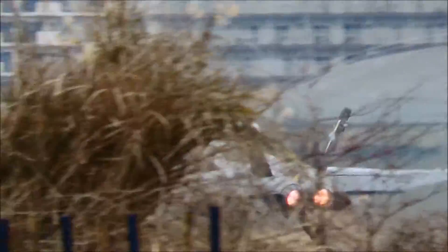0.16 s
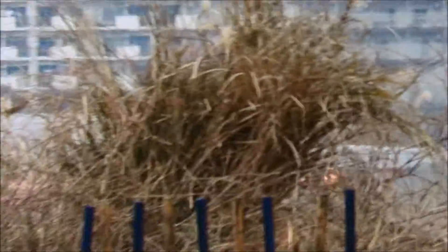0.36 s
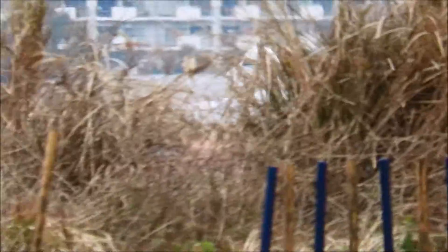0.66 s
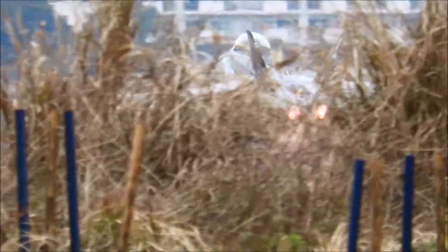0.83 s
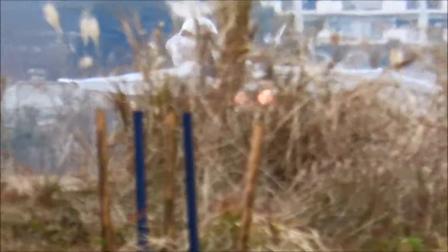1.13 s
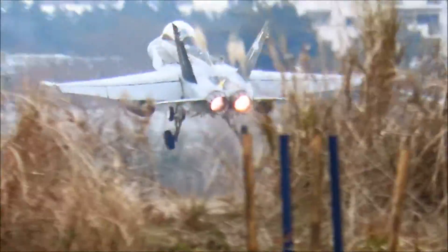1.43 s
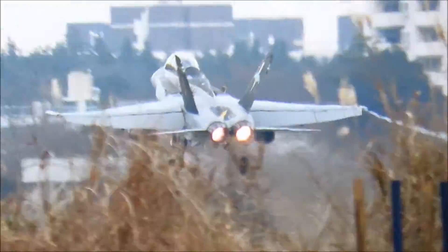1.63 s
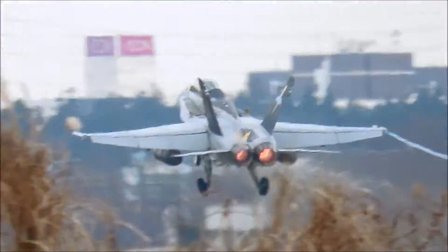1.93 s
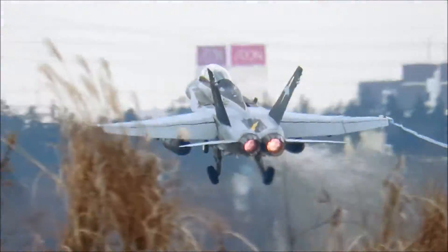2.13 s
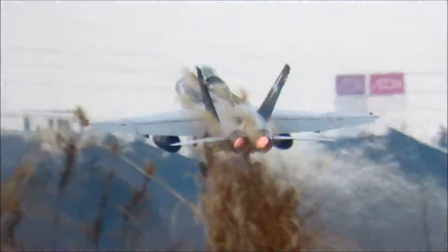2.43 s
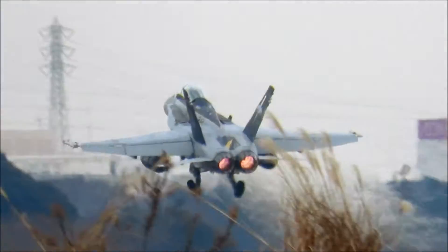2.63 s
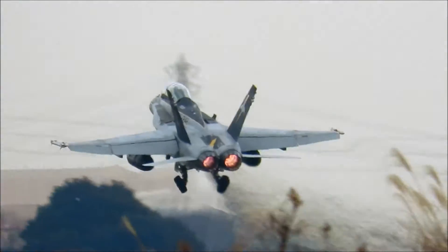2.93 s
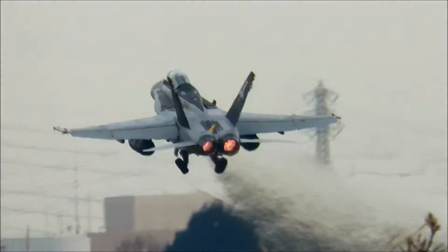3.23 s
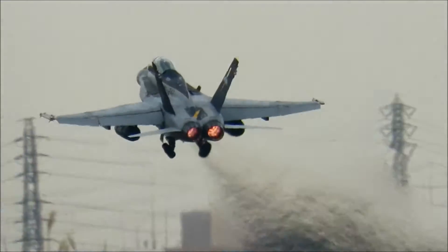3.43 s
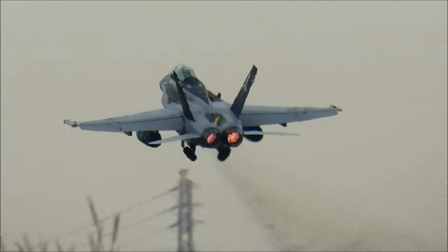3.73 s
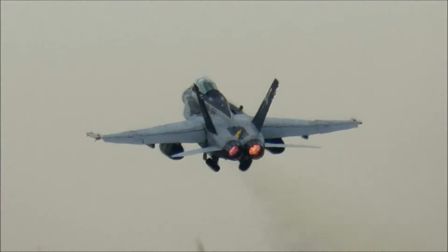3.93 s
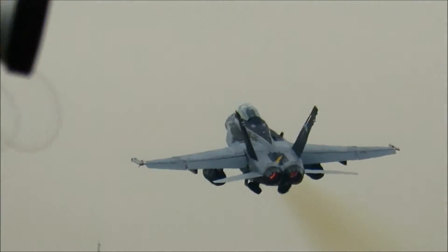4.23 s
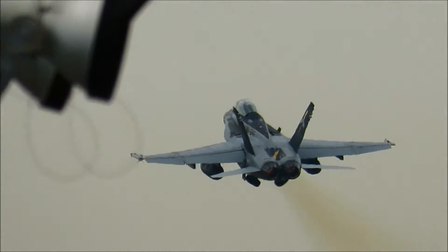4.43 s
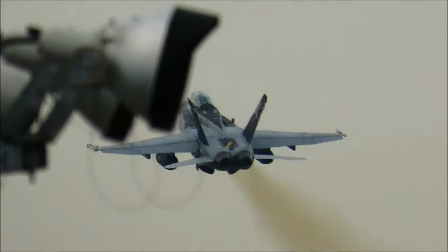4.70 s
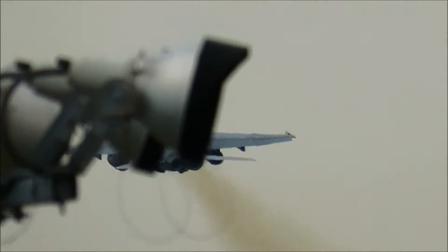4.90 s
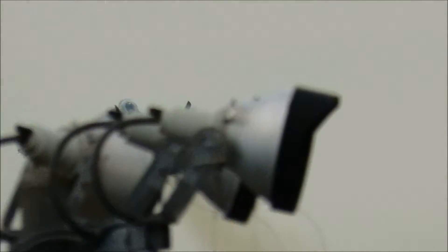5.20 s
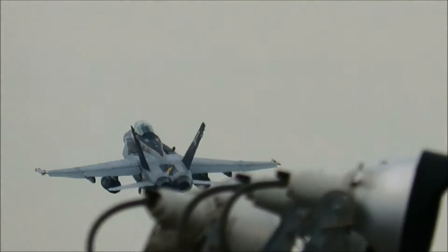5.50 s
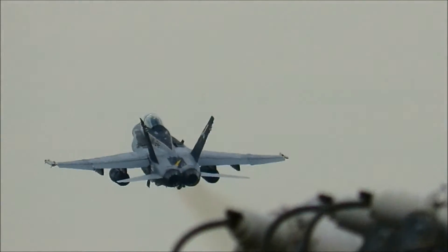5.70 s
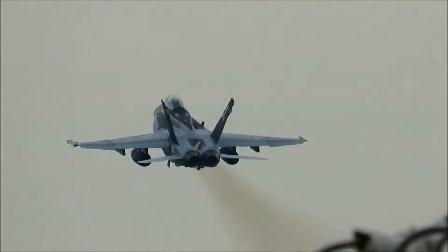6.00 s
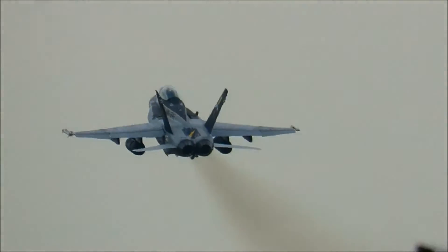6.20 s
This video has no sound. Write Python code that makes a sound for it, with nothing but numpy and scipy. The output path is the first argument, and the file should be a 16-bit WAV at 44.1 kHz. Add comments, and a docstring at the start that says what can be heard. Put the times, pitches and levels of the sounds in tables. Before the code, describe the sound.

Distant jet takeoff outdoors: broad rumbling engine roar in uneven surges, with bursts of steep, dry crackling early, again after two seconds, and near five.

```python
"""Twin-engine jet climbing away

A twin-engine jet climbs away at full thrust, far down the field from a small stereo camera.
The roar is noise in half-octave bands, swelling as the air bends its path; a ground echo dips it above the rumble.
Steep shock fronts crackle on top, singly and in clusters; ground and buildings give each a short scattered tail.
Far above the roar lies a faint band of hiss, with two ticks of dry rustle nearby."""
import sys
import numpy as np
from scipy import signal
from scipy.fft import rfft, irfft
from scipy.io import wavfile
from scipy.ndimage import uniform_filter1d, minimum_filter1d

SR = 44100
rng = np.random.default_rng(int(sys.argv[2]) if len(sys.argv) > 2 else 0)


def transcribe(signal):
    """Save signal, clipped to [-1, 1], as a 16-bit WAV file at the path in sys.argv[1]."""
    frames = np.atleast_2d(signal).T
    limited = np.clip(frames, -1, 1)
    pcm = np.round(limited * 32767).astype(np.int16)
    wavfile.write(sys.argv[1], SR, pcm)


N = 280035  # samples

# Swells of the roar as the air bends its path, before ROAR_SHARE_DB: t/s, level/dB
ROAR_SWELL = [(0, -24.5), (.35, -23.5), (.44, -22), (.49, -20.5), (.55, -22), (.63, -18.5), (.75, -20),
              (.88, -20), (.97, -19), (1.08, -19.5), (1.15, -17.5), (1.22, -19.5), (1.3, -20.5),
              (1.58, -22.5), (1.72, -16.5), (1.95, -19), (2.05, -17), (2.09, -20), (2.14, -18), (2.22, -21),
              (2.32, -28), (2.62, -28), (2.73, -26.5), (3, -27.5), (3.05, -24.5), (3.1, -20.5),
              (3.17, -22.5), (3.25, -21.5), (3.36, -27), (3.42, -25), (3.62, -22.5), (3.95, -21),
              (4.07, -22.5), (4.2, -19), (4.25, -21.5), (4.31, -19.5), (4.65, -19.5), (4.8, -16.5),
              (5.07, -17.5), (5.2, -19.5), (5.3, -24.5), (5.7, -25.5), (6.07, -24), (6.2, -23), (6.35, -22)]
# Rumble under the ground dip, before its flicker: t/s, level/dB
RUMBLE = [(0, -25.5), (.2, -31), (.4, -32), (.6, -32.5), (1.1, -33.5), (1.6, -37.5), (2, -34), (2.5, -38),
          (3, -35), (3.4, -37.5), (3.75, -35), (4.15, -26), (4.55, -33.5), (4.8, -28.5), (5.3, -36.5),
          (5.7, -34.5), (5.93, -41), (6.1, -34.5), (6.35, -32)]
# Colour of the roar, relative to its level: t/s, growl/dB, high roar/dB, rasp/dB
COLOUR = [(0, -8, -2.5, -9), (.2, -11, -4, -12), (.4, -7.5, -4, -11.5), (.55, -21, -6.5, -13),
          (.7, -20.5, -13.5, -18), (1.1, -10.5, -7.5, -15.5), (1.6, -9.5, -5, -14.5), (2.05, -6, -4.5, -13),
          (2.17, -8.5, 1, -11), (2.35, 2, -13, -19), (2.5, -3.5, 0.5, -11.5), (2.7, -11.5, -6, -10.5),
          (2.95, -6, -0.5, -8.5), (3.2, -15.5, -6, -18), (3.4, -8, -6.5, -14), (4.3, -6.5, -2, -11),
          (4.8, -7, -1.5, -12), (4.97, -5.5, -4, -15), (5.1, -11, -6.5, -14), (5.25, -6, -6, -16.5),
          (5.4, -10, -2, -11.5), (5.9, -12, 1, -14), (6.1, -5, 0, -14), (6.19, -5, 0, -11.5),
          (6.22, -11, 5, -10), (6.28, -8, 4, -7), (6.31, -6, 3.5, -8), (6.35, -8.5, 11, -4)]
# Spectral shape of the roar, before the layers are levelled: f/Hz, relative density/dB
ROAR_SHAPE = [(12, -49.5), (20, -34.5), (76, -1), (100, -2.5), (150, -16), (210, -11.5), (271, -3),
              (380, -1), (520, 1.5), (680, 0), (850, -1.5), (1120, -5), (1340, -8), (1520, -12.5),
              (1950, -17), (2450, -23), (3160, -37), (4110, -53), (6950, -120)]
# Rumble, growl, roar, high roar, rasp: centre f/Hz, from f/Hz, to f/Hz
LAYERS = [(75, 50, 120), (340, 200, 400), (520, 300, 1300), (1020, 800, 1300), (1900, 1400, 2600)]
# The ground echo lengthens in the climb and the dip wanders with the rumble:
# t/s, upward shift/octaves, change in the dip/dB, change at its upper edge/dB
GROUND_DIP = [(0, 0.2, -10.5, -1.5), (.5, 0.33, 3, 7), (1, 0.12, -2, 5.5), (1.6, 0.058, 3.5, 1),
              (2.2, -0.083, -1.5, -1), (2.8, -0.024, 8, 0.5), (3.2, 0.021, -6.5, -7),
              (3.45, -0.21, -6.5, -7), (3.8, -0.084, -1.5, -4.5), (4.2, -0.1, 0.5, -2.5),
              (4.75, -0.012, 2, 1), (5.15, 0.022, -6, -14), (5.7, -0.23, 7, 3.5), (6.35, -0.074, 0, -3.5)]
# How alike the two microphone ports hear the roar: f/Hz, likeness/0-1
LIKENESS = [(30, 0.88), (60, 1), (100, 1), (180, 0.9), (350, 0.6), (650, 0.3), (1200, 0.4), (2200, 0.9),
            (5000, 0.03)]
# Phase lead of the left port: f/Hz, lead/rad
LEFT_LEAD = [(60, -0.037), (300, -.8), (450, 0.97), (700, -1.1), (1100, 0.77), (2200, 1), (5000, 0.71)]
# Balance of the roar between the ports: f/Hz, left minus right/dB
LEFT_GAIN = [(60, -1.5), (92, 3.5), (140, 1), (210, -2.5), (330, -1), (500, -4.5), (760, -3), (1160, -1),
             (1770, -6), (2710, -3)]
# Small swings of the camera, used about their mean: t/s, left minus right/dB
CAMERA_SWING = [(0.0, -5), (2.99, -3.5), (3.24, -5), (3.31, -3.5), (4.62, -2), (4.88, -4.5), (6.35, -4)]
# Lone shocks, before panning and port colour: t/s, treble peak level/dB, rise time/ms
LONE_SHOCKS = [(0.0354, -35.5, 0.062), (0.0866, -47, 0.11), (0.1337, -36, 0.068), (0.156, -42, 0.2),
               (0.184, -42, 0.16), (0.2596, -35.5, 0.18), (0.272, -47, 0.14), (0.283, -39, 0.16),
               (0.339, -44, 0.15), (0.3893, -47, 0.12), (0.429, -43, 0.086), (0.4389, -45, 0.12),
               (0.468, -44, 0.13), (0.478, -44, 0.1), (0.514, -31.5, 0.093), (0.5168, -38, 0.11),
               (0.526, -41, 0.16), (0.5462, -33.5, 0.15), (0.549, -35, 0.11), (0.5648, -36, 0.13),
               (0.57, -32, 0.064), (0.596, -39, 0.067), (0.615, -26, 0.03), (0.627, -34.5, 0.11),
               (0.6635, -44, 0.06), (0.6663, -35, 0.08), (0.6735, -29.5, 0.079), (0.687, -42, 0.1),
               (0.7306, -47, 0.15), (0.752, -40.5, 0.18), (0.7724, -48, 0.13), (0.789, -40, 0.19),
               (1.17, -48, 0.12), (1.858, -41, 0.23), (2.033, -41, 0.09), (2.1473, -27, 0.12),
               (2.195, -32, 0.076), (2.231, -29, 0.042), (2.2603, -32, 0.25), (2.266, -26, 0.04),
               (2.281, -51, 0.088), (2.2965, -32, 0.062), (2.3086, -35.5, 0.11), (2.336, -32, 0.05),
               (2.3488, -35, 0.1), (2.356, -24, 0.04), (2.374, -21.5, 0.031), (2.381, -47, 0.12),
               (2.4103, -43, 0.13), (2.433, -44, 0.06), (2.441, -27, 0.061), (2.4593, -36, 0.15),
               (2.4745, -40, 0.14), (2.4909, -38, 0.19), (2.524, -46, 0.05), (2.652, -43.5, 0.18),
               (2.6989, -44, 0.18), (2.8463, -42, 0.17), (2.902, -42, 0.13), (2.927, -35.5, 0.095),
               (3.015, -38, 0.097), (3.0907, -48, 0.22), (3.122, -34, 0.16), (3.137, -40, 0.12),
               (3.1795, -43, 0.14), (3.1947, -48, 0.12), (3.2211, -32, 0.1), (3.2653, -42, 0.17),
               (3.2983, -43, 0.14), (3.323, -51, 0.18), (3.3938, -48, 0.17), (3.474, -52, 0.14),
               (3.954, -43.5, 0.27), (4.4106, -43, 0.13), (4.831, -39.5, 0.13), (4.8673, -33.5, 0.084),
               (4.882, -37, 0.09), (4.8964, -37, 0.15), (4.983, -45, 0.096), (5.0003, -35, 0.15),
               (5.0474, -39, 0.19), (5.0586, -35, 0.07), (5.111, -33, 0.12), (5.122, -43, 0.073),
               (5.1367, -36, 0.18), (5.1395, -38, 0.15), (5.168, -42, 0.06), (5.174, -47, 0.04),
               (5.1831, -40.5, 0.22), (5.1979, -49.5, 0.19), (5.2045, -31, 0.25), (5.2125, -42, 0.2),
               (5.236, -47, 0.27), (5.249, -47, 0.15), (5.274, -42, 0.19), (5.385, -51.5, 0.28),
               (5.4412, -49, 0.2), (5.4555, -47.5, 0.27), (5.5777, -47, 0.19), (5.591, -46, 0.27),
               (5.62, -54, 0.31), (5.7944, -48.5, 0.23), (6.186, -51, 0.29), (6.222, -53, 0.33),
               (6.278, -41, 0.13)]
# Fine crackle, before port colour: t/s, blunt fronts level/dB, sharp fronts level/dB, dull thumps level/dB
CRACKLE = [(0, -64, -66, -35), (.45, -58, -65.5, -29), (.62, -62, -60, -25), (.83, -61, -69.5, -28),
           (1.15, -62, -69, -28), (1.6, -62.5, -64, -28), (1.95, -58, -63.5, -31.5),
           (2.1, -53.5, -56.5, -26), (2.25, -55, -57, -24), (2.38, -58, -60, -25), (2.46, -64.5, -59, -27),
           (2.56, -61.5, -68.5, -35), (2.75, -67.5, -70.5, -32), (3.13, -59.5, -68, -28),
           (3.4, -66.5, -78.5, -29), (4.35, -60, -66.5, -29.5), (4.7, -67, -67.5, -26.5),
           (4.82, -58, -65, -28), (4.875, -55, -60.5, -25), (4.93, -58, -68, -29.5),
           (5.03, -59.5, -61, -22.5), (5.19, -64, -63, -29.5), (5.3, -64.5, -78, -28),
           (5.8, -70.5, -74.5, -37), (6.17, -79.5, -74, -29), (6.35, -70, -66, -22)]
# Port resonances on the shocks, left then right; the lowest is the ground dip:
# f/Hz, width/Hz, share added or taken
PORT_RING = [
    [(204, 300, -0.3), (645, 400, -0.8), (1700, 1500, 0.03)],
    [(196, 130, -0.59), (854, 570, 0.95), (2100, 2100, 0.42)],
]
# Narrow bands drifting through roar and shocks, perhaps as paths interfere:
# each has t/s, centre f/Hz, share added or taken
NOTCH = [(0, 1085, -0.15), (1.2, 1067, -0.21), (1.8, 1060, -.5), (2.5, 1040, -0.41), (3.1, 1140, -0.11),
         (4.5, 1153, -0.13), (5.4, 1240, -0.39), (6.35, 1306, -0.32)]
RIDGE = [(0, 1430, -0.29), (.8, 1496, -0.26), (1.6, 1390, 0.073), (2.2, 1310, 0.34), (2.85, 1370, 0.45),
         (3.4, 1356, -0.041), (4.3, 1355, 0.25), (5, 1455, .2), (5.6, 1546, 0.068), (6.2, 1680, 0.78),
         (6.35, 1650, 0.78)]
FOCUS = [(0, 820, .5), (.8, 830, 0.3), (1.5, 785, 0.23), (2.2, 815, 0.23), (2.5, 820, .03),
         (3.1, 784, 0.17), (3.6, 780, 0.032), (6.35, 775, 0.031)]
# Widths of the notch, ridge and focus bands: width/Hz
BAND_WIDTH_HZ = [140, 180, 260]
# Faint high hiss, before its flutter and balance: t/s, level/dB
HISS = [(0, -94), (.55, -85), (1.1, -84.5), (1.75, -81.5), (2.6, -88.5), (3.6, -79.5), (4.15, -76),
        (4.85, -74.5), (5, -85), (5.4, -84), (6.1, -77), (6.35, -76)]
# Ticks of dry rustle: t/s, starting level/dB, decay/s
RUSTLE_TICKS = [(5.6815, -64, .006), (5.697, -74, .025)]

ROAR_SHARE_DB = -2.16  # smooth part of the roar, beside the thumps
SHOCK_PAN_DB, SHOCK_PAN_SPREAD_DB = 1.7, 3.5  # left minus right
# a lone front that rises slower than AIR_RISE_MS has lost more treble to the air
AIR_HZ, AIR_RISE_MS, AIR_POWER, AIR_STEEP = 10400, 0.042, 0.41, 2.6
LEAD = 32  # samples kept ahead of a front
TOP_HZ = 15700  # top of the camera's range


def undb(db):
    """Decibels to amplitude."""
    return 10 ** (np.asarray(db) / 20)


def unit(x):
    """Scale to rms 1."""
    return x / np.sqrt(np.mean(x ** 2))


def curves(table):
    """Columns of a timed table, drawn as automation at every sample."""
    t, *columns = np.transpose(table)
    return [np.interp(np.arange(N) / SR, t, column) for column in columns]


def over(hz, table):
    """Table value at each frequency, on a log axis."""
    f, value = np.transpose(table)
    return np.interp(np.log(hz + 1), np.log(f), value)


def walk(rate):
    """Random levels, rate new ones a second, slewed twice; mean 0, spread 1."""
    hold = max(int(SR / rate), 1)
    steps = np.repeat(rng.standard_normal(N // hold + 1), hold)
    w = uniform_filter1d(uniform_filter1d(steps, hold), hold)[:N]
    return (w - w.mean()) / w.std()


def bandpass(x, order, low_hz, high_hz):
    """Keep the sound between two frequencies."""
    return signal.sosfilt(signal.butter(order, [low_hz, high_hz], "band", fs=SR, output="sos"), x)


def port_noise(hz):
    """Spectra of roar noise at the left and right ports, partly alike and tinted by each port."""
    shared, own = rfft(rng.standard_normal((2, N)))
    like = np.clip(over(hz, LIKENESS), 0, 1)
    half_gain_db = over(hz, LEFT_GAIN) / 2
    left = like * shared * np.exp(1j * over(hz, LEFT_LEAD)) + np.sqrt(1 - like ** 2) * own
    pair = np.array([left * undb(half_gain_db), shared * undb(-half_gain_db)])
    return pair * undb(over(hz, ROAR_SHAPE))


def roar():
    """Half-octave bands of turbulence; eddies make neighbours throb together and each flicker alone."""
    roar_db = curves(ROAR_SWELL)[0] + ROAR_SHARE_DB
    growl_db, high_db, rasp_db = curves(COLOUR)
    slide, dip_db, edge_db = curves(GROUND_DIP)
    hz = np.fft.rfftfreq(N, 1 / SR)
    pair = port_noise(hz)

    # gain that brings each layer of the noise to its drawn level
    layers_db = [curves(RUMBLE)[0], roar_db + growl_db, roar_db, roar_db + high_db, roar_db + rasp_db]
    mono = pair.mean(axis=0)
    layer_rms = [irfft(mono * (hz > low) * (hz < high), N).std() for _, low, high in LAYERS]
    swell_db = np.array(layers_db) - 20 * np.log10(layer_rms)[:, None]

    # the throb is quick only; slow swells are in the tables
    quick = walk(70) + 0.12 * walk(22)
    throb = quick - uniform_filter1d(quick, size=5000)

    log_centres = np.log(np.array(LAYERS)[:, 0])
    out = 0
    for step in range(-1, 16):
        centre = 30 * 2 ** (step / 2)  # Hz
        # blend the gains of the two nearest layers
        place = np.interp(np.log(centre), log_centres, np.arange(len(LAYERS)))
        k = min(int(place), len(LAYERS) - 2)
        db = swell_db[k] + (place - k) * (swell_db[k + 1] - swell_db[k])
        if centre < 300:  # the low end of the shape slides with the dip
            db = db + over(centre / 2 ** slide, ROAR_SHAPE) - over(centre, ROAR_SHAPE)
        if 150 < centre < 260:
            db = db + (dip_db if centre < 200 else edge_db)
        flicker = 0.39 * walk(7.7)
        db = db + min(centre / 900, 1.6) * throb + flicker
        # cosine crossfade into the bands on either side
        away = np.clip(2 * np.log2((hz + 1) / centre), -1, 1)
        out = out + undb(db) * irfft(pair * np.cos(np.pi / 2 * away) ** 2, N)
    pan_db = curves(CAMERA_SWING)[0]
    pan_db = pan_db - pan_db.mean()
    return out * undb(np.array([pan_db, -pan_db]) / 2)


def front(rise_ms, fall_hz=764.0, low_hz=300.0, air_hz=8600.0, size=1024):
    """One shock: a steep drop, a slower recovery and overshoot, rounded by the air; treble peak 1."""
    hz = np.fft.rfftfreq(size, 1 / SR)
    jf = 1j * hz
    overshoot = (jf / (jf + low_hz)) ** 2
    recovery = 1 / (1 + jf / fall_hz)
    rise = 1 / (1 + 2 * np.pi * jf * np.clip(rise_ms, .01, .4) / 1000) ** 2
    air = np.exp(-(hz / air_hz) ** AIR_STEEP)
    h = -overshoot * recovery * rise * air
    treble = irfft(h * (hz > 3200) * (hz < 9000))
    return np.roll(irfft(h), LEAD) / np.abs(signal.hilbert(treble)).max()


def scatter(wave, tail_db, tail_t60=0.016, size=1024):
    """The direct front (right a moment later), then a decaying random tail from ground and walls."""
    t = np.arange(size) / SR
    path = rng.standard_normal((2, size)) * 1000. ** (-t / tail_t60) * (t > .0006)
    path *= undb(tail_db) / np.linalg.norm(path, axis=1, keepdims=True)
    path[0, 0], path[1, 2] = 1, 1  # direct arrival, left and right
    return signal.fftconvolve(path, wave[None])


def lone_shocks():
    """Cracks that stand out: single fronts, duller where they rise slowly, each with its own pan and tail."""
    out = np.zeros((2, N + 8192))
    for t, db, rise_ms in LONE_SHOCKS:
        pan_db = SHOCK_PAN_DB + SHOCK_PAN_SPREAD_DB * rng.standard_normal()
        air_hz = AIR_HZ * min(AIR_RISE_MS / rise_ms, 1) ** AIR_POWER
        wave = scatter(front(rise_ms, air_hz=air_hz), tail_db=-7.0, tail_t60=0.010)
        start = int(t * SR) - LEAD
        out[:, start:start + wave.shape[1]] += undb(db + np.array([[pan_db], [-pan_db]]) / 2) * wave
    return out[:, :N]


def swarm(wave, per_s, spread_db, tail_db, count=8):
    """Dense small shocks, mostly weak and now and then strong, along several paths; treble rms 1."""
    out = 0
    for _ in range(count):
        chance, strength = rng.random((2, 2, N)).swapaxes(0, 1)[:, 0]
        boost_db = np.minimum(-spread_db * np.log(strength + 1e-9), 12.0)
        train = (chance < per_s / count / SR) * undb(boost_db)
        out = out + signal.oaconvolve(scatter(wave, tail_db), train[None])[:, :N]
    return out / bandpass(out, 3, 3300, 6500).std()


def fine_crackle():
    """Swarms of shocks: dull thumps make the roar ragged, blunt fronts fill in, sharp ones come in flares."""
    blunt_db, sharp_db, thump_db = curves(CRACKLE)
    blunt = swarm(front(0.09, low_hz=410.0, air_hz=3670.0), per_s=350., spread_db=2.5, tail_db=-3.5)
    sharp = swarm(front(0.038, air_hz=10200.0), per_s=1500.0, spread_db=1.0, tail_db=1.3)
    dull_front = front(0.16, low_hz=382.0, air_hz=2500.0)
    thump = unit(swarm(dull_front, per_s=160., spread_db=3.0, tail_db=-4.0, count=4))
    balance = undb([[0.1], [1.5]])  # left, right
    return (blunt * undb(blunt_db) + sharp * undb(sharp_db)) * balance + thump * undb(thump_db)


def ports(shocks):
    """Each microphone port colours a front with its own resonances and dips."""
    out = []
    for x, rings in zip(shocks, PORT_RING):
        coloured = x
        for hz, width_hz, share in rings:
            b, a = signal.iirpeak(hz, hz / width_hz, SR)
            coloured = coloured + share * signal.lfilter(b, a, x)
        out.append(coloured)
    return np.array(out)


def drifting_bands(x):
    """Each band is shifted down to zero, smoothed, shifted back and added or taken away."""
    for table, width_hz in zip((NOTCH, RIDGE, FOCUS), BAND_WIDTH_HZ):
        hz, share = curves(table)
        turn = np.exp(2j * np.pi * np.cumsum(hz) / SR)
        pole = np.exp(-np.pi * width_hz / SR)
        smooth = signal.lfilter([1 - pole], [1, -pole], x / turn)
        band = 2 * (smooth * turn).real
        x = x + np.clip(share, -.9, 2) * band
    return x


def hiss(noise):
    """A faint, fluttering band of noise far above the roar."""
    flutter_db = .8 * walk(40) + .6 * walk(5.8)
    balance_db = np.array([[-1.5], [1.5]])  # left, right
    return unit(bandpass(noise, 2, 6000, 13500)) * undb(curves(HISS)[0] + flutter_db + balance_db)


def rustle(noise):
    """A dry rustle nearby: ticks of band noise that start at once and die away exponentially."""
    envelope = 0
    for t, db, decay_s in RUSTLE_TICKS:
        after = np.arange(N) / SR - t
        envelope = envelope + undb(db) * (after > 0) * np.exp(-np.abs(after) / decay_s)
    return envelope * unit(bandpass(noise, 2, 4200, 10800))


def scene():
    """Roar and port-coloured shocks pass through the drifting bands; hiss and rustle share one noise."""
    jet = drifting_bands(roar() + ports(lone_shocks() + fine_crackle()))
    noise = rng.standard_normal((2, N)) + 1.1 * rng.standard_normal(N)  # partly common to both sides
    return jet + hiss(noise) + rustle(noise)


def record(dry):
    """A quick limiter eases the tallest peaks down; then the camera cuts the top."""
    ceiling = .74
    gain = np.minimum(1, ceiling / (np.abs(dry).max(axis=0) + 1e-9))
    gain = minimum_filter1d(gain, size=361)
    gain = uniform_filter1d(uniform_filter1d(gain, size=181), size=181)
    return signal.sosfilt(signal.ellip(8, .2, 70, TOP_HZ, fs=SR, output="sos"), dry * gain)


dry = scene()
out = record(dry)
transcribe(out)
```